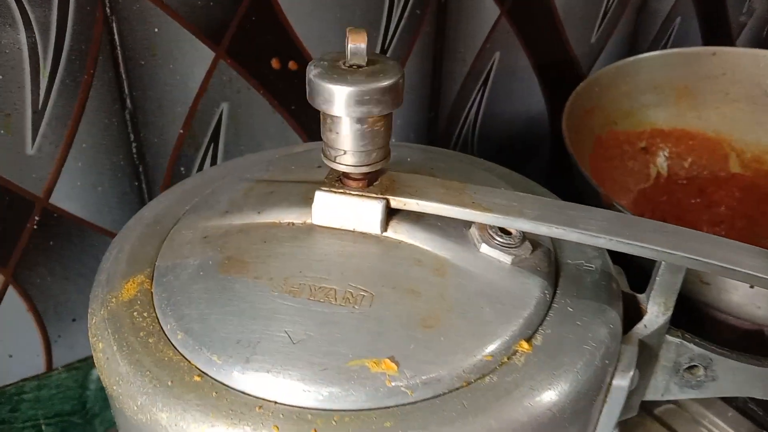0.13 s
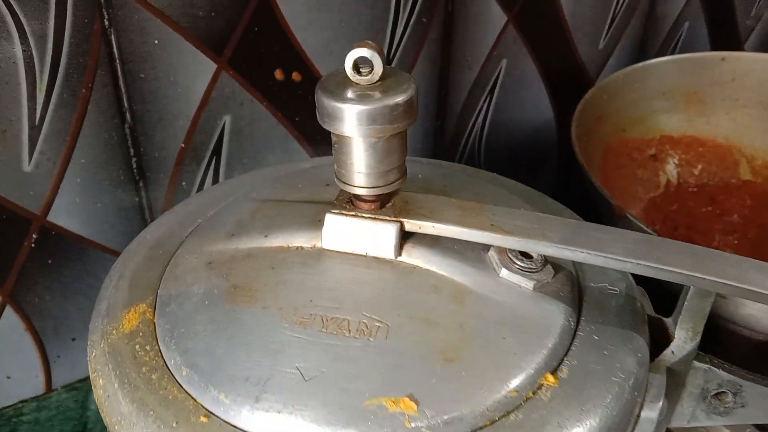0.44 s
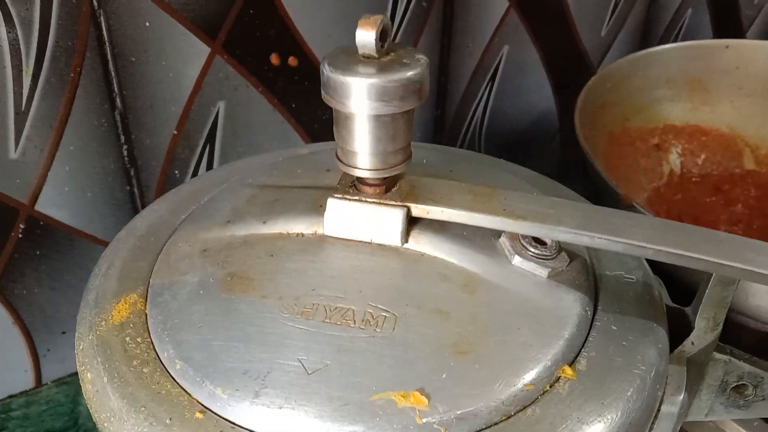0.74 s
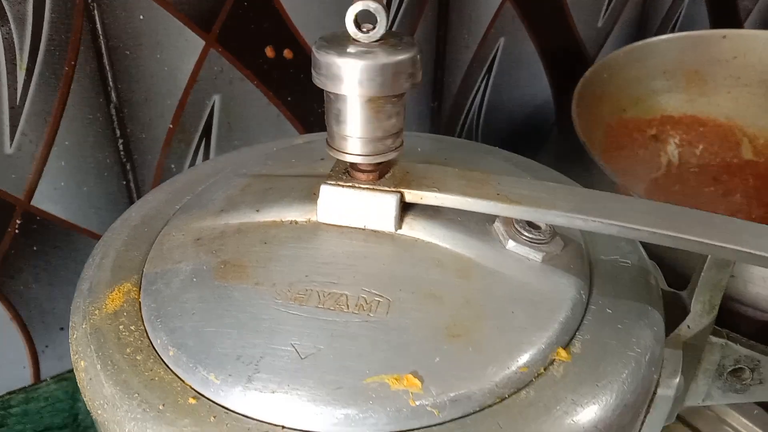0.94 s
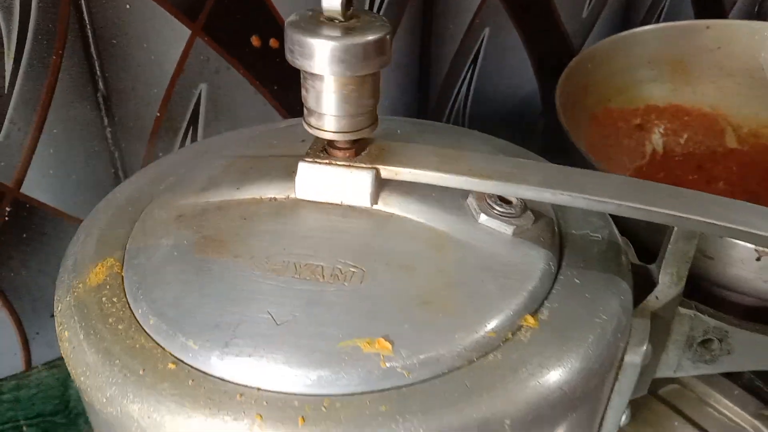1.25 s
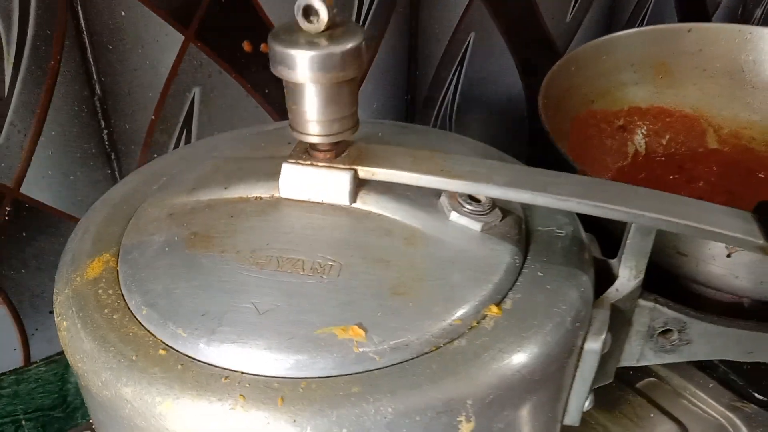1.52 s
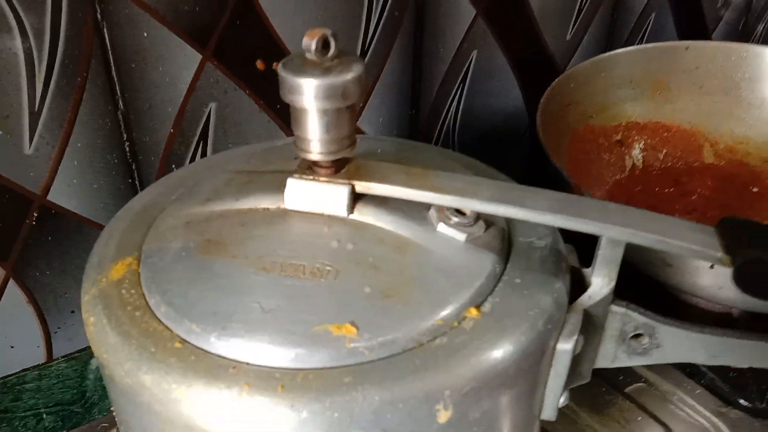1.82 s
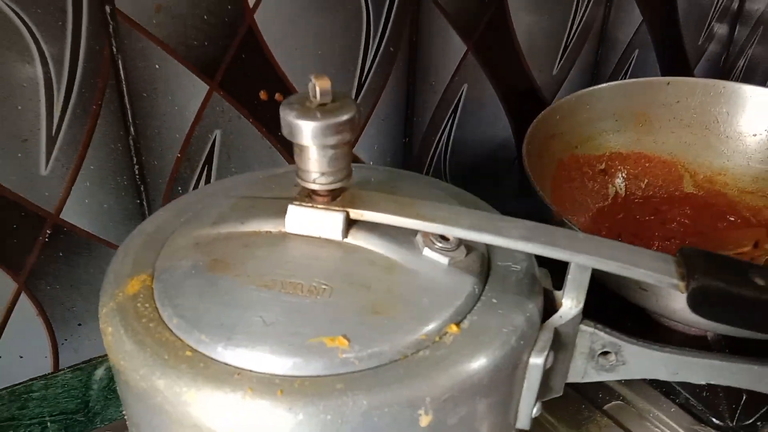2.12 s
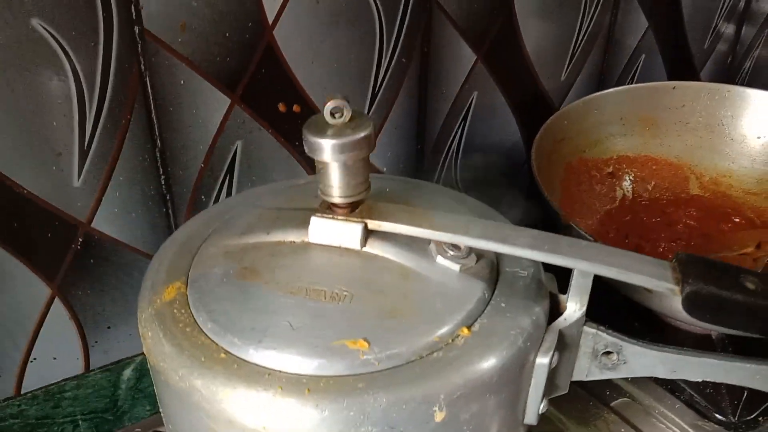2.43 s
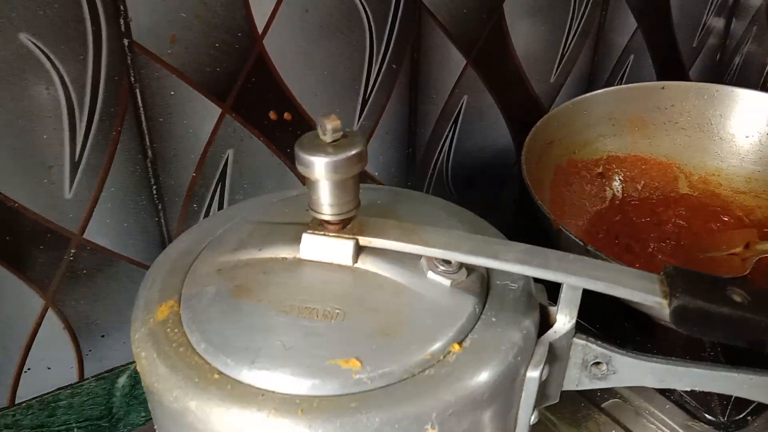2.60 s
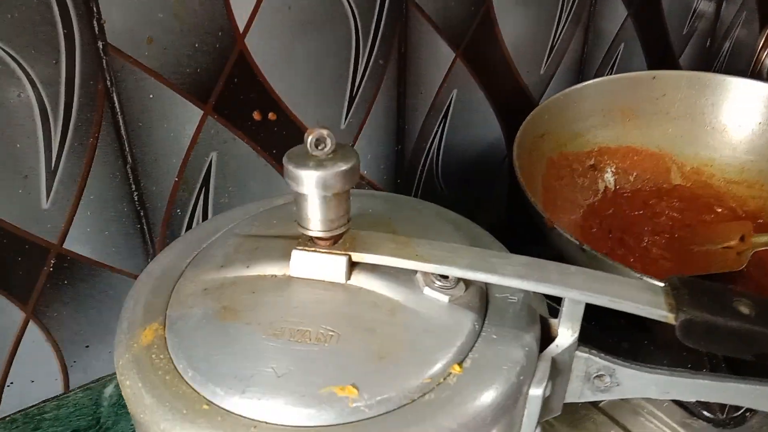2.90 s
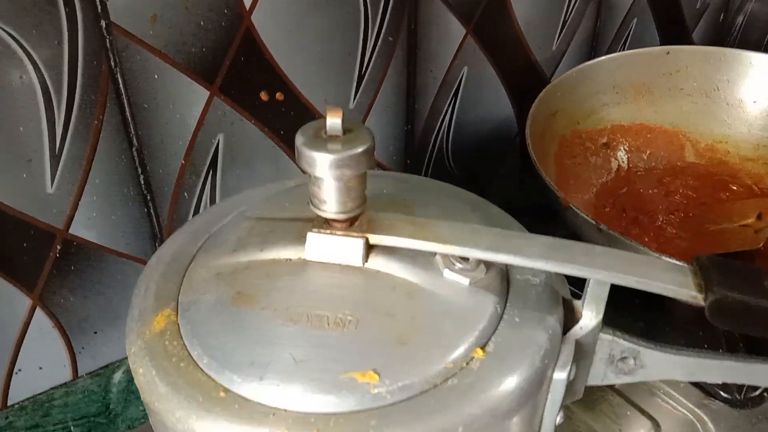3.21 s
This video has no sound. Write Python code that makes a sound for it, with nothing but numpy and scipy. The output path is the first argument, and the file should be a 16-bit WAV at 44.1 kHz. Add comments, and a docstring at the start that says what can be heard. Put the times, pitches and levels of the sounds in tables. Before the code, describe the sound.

Pressure cooker steam hisses continuously and loudly from the first instant, close to the microphone in a small, hard-tiled kitchen. Quick irregular swells, about seven per second, each add a hollow, breathy chuff under crisp sizzle and airy ringing. Swells weaken around 1.35-1.45 and 2.45 seconds, while the steady leak grows slightly later. A very faint low hum rises near 0.9 seconds; a light metallic pan knock comes around 3.3.

```python
"""Kitchen: a pressure cooker vents on the stove, close up, the same in both channels.
The valve weight turns and rocks, so a steady leak of steam swells about seven times a second.
Shaped noise makes the hiss and sizzle, droplets spit into it, and resonated noise rings the gaps of the weight;
each swell adds a hollow tone, a low rush and a breathy cavity. Lid, tiles and room reflect the steam.
A faint low hum comes and goes in the background, and at the end decaying sines knock a pan lightly."""
import sys
import numpy as np
from scipy import signal
from scipy.fft import rfft, irfft
from scipy.io import wavfile
from scipy.ndimage import uniform_filter1d, map_coordinates

SR = 44100
rng = np.random.default_rng(int(sys.argv[2]) if len(sys.argv) > 2 else 0)


def wav_out(sig):
    """Save sig, one row per channel (or a flat mono array), as 16-bit PCM at SR to the path in sys.argv[1]."""
    wavfile.write(sys.argv[1], SR, np.round(np.clip(np.atleast_2d(sig).T, -1, 1) * 32767).astype(np.int16))


N = 147735  # samples

# Kitchen background tone, relative: hz, level_db
KITCHEN_COLOUR = [(20, -16), (50, -16), (85, 4), (120, 4.5), (170, 11.5), (300, -1), (800, -17),
                  (3000, -35)]
KITCHEN_DB = -69
# Low hum resonances, before the hum fader: pitch_hz, width_hz of one filter pass, level_db
HUM_MODES = [(112, 28, -54), (155, 76, -59)]
# Hum fader: time_s, level_db
HUM_FADER = [(.55, -23), (.76, -6), (.87, 0), (1.02, -2), (1.08, -12.5), (1.75, -13), (2.0, -25)]

# Modes of lightly knocked cookware, relative: pitch_hz, level_db, t60_s
PAN_MODES = [(486, -11.5, .1), (800, -18, .06), (1250, -10, .1), (1950, 1.5, 0.057), (2400, -5.5, .08)]
KNOCK_S, KNOCK_DB, KNOCK_CONTACT_S = 3.329, -25, 0.00025  # start, level, softness of the attack

# Reflections from lid and tiles, against the direct steam: delay_s, level_db
NEAR_REFLECTIONS = [(.0031, -19.5), (.0053, -22.5), (.0084, -18.5), (0.0132, -22)]
SWAY_S, SWAYS_PER_S = .00005, 1  # rms delay change as the hand holding the microphone sways
ROOM_T60_S, ROOM_DB = 0.13, -9  # level against the direct steam
STEAM_DB = -0.81  # trim of the valve with its reflections and room

# Swells as the weight lifts, levels before the layer trims:
# centre_s (middle of the hiss swell), length_s (hiss, at half power), hiss_db, hollow_db, rush_db,
# lag_s (hollow tone, rush and cavity behind the hiss; negative leads)
WEIGHT_SWELLS = [(0.018, 0.088, -17, -31, -43.5, -0.0087), (0.191, 0.073, -16.5, -32.5, -45, -0.003),
                 (0.315, 0.071, -20.5, -40, -53, 0.007), (0.452, 0.076, -19, -32.5, -44, 0.025),
                 (0.546, 0.105, -21, -41, -55, 0.017), (0.646, 0.079, -19, -42.5, -51.5, 0.015),
                 (0.77, 0.1, -16.6, -36.5, -44.5, 0.0033), (0.906, 0.093, -16, -31, -42, -0.0018),
                 (1.072, 0.082, -18, -34.5, -48.5, -0.00063), (1.229, 0.08, -17.5, -34, -41, 0.012),
                 (1.347, 0.082, -27, -51, -54, 0.0044), (1.445, 0.083, -26.5, -35.5, -49, -0.0006),
                 (1.574, 0.089, -17.8, -33.5, -47.5, -0.0055), (1.75, 0.09, -17, -31, -43.5, 0.018),
                 (1.919, 0.1, -16.6, -31, -45.5, -0.0058), (2.058, 0.08, -22, -38, -50.5, -0.005),
                 (2.207, 0.081, -18.0, -33, -43.5, 0.0033), (2.444, 0.098, -27, -43, -56.5, 0.00074),
                 (2.59, 0.095, -22, -35, -57, 0.0062), (2.794, 0.1, -19.0, -37.5, -46, 0.013),
                 (2.948, 0.097, -17.5, -31.5, -42.5, 0.0077), (3.135, 0.1, -17.5, -32.5, -47, 0.027),
                 (3.331, 0.096, -21, -33.5, -49, 0.025)]
# Steady leak between swells, before the layer trims: time_s, level_db
STEADY_LEAK = [(0, -24.5), (.38, -25.5), (.52, -26), (1.3, -22.5), (1.65, -24.5), (2.3, -21.5),
               (3.35, -20.5)]

# Hollow tone under the weight, relative: hz, level_db
HOLLOW_COLOUR = [(100, -65), (700, -44), (1080, -6), (1270, -3.5), (1400, 1.5), (1600, 0.5), (1900, -4.5),
                 (2150, -4.5), (2550, -10), (3200, -15), (5000, -38)]
# Low rush, relative: hz, level_db
RUSH_COLOUR = [(30, -31), (100, -22), (170, -12.5), (280, -9), (420, -4.5), (500, 1.5), (720, 3.5),
               (870, 1.5), (1050, -2.5), (1500, -23), (3000, -47)]
HOLLOW_DB, RUSH_DB = -2, 0.5  # layer trims
HOLLOW_LEAK_DB, RUSH_LEAK_DB, CAVITY_LEAK_DB = -20.5, -36, -25  # against the steady leak
CAVITY_HZ, CAVITY_WIDTH_HZ = 1257, 114  # inside the weight; width of one filter pass
CAVITY_SWELL_DB = -7.5  # against the hollow tone of each swell, before its trim
# Swell shape: 2 is a bell, more is flatter; rush lengths are a share of the hiss lengths
HISS_SQUARENESS, RUSH_SQUARENESS, RUSH_LENGTH_SHARE = 3.06, 2.3, 0.84

# Jet hiss, relative: hz, level_db
HISS_COLOUR = [(100, -75), (1500, -30), (2700, -25), (3100, -14), (3300, -5.5), (3600, -4), (4700, -1.5),
               (5600, 1.5), (6350, -0.5), (7450, 2), (7950, -11.5), (8700, -5.5), (10000, -11),
               (15500, -37)]
# Finest sizzle at the lip of the valve, relative: hz, level_db
SIZZLE_COLOUR = [(500, -83), (6500, -26), (8000, -1.5), (8750, -7), (9250, 5.5), (9900, 1.5), (10350, 4),
                 (11000, -4), (11700, -4), (12450, -1.5), (13300, 0), (14000, -8), (14600, -5.5),
                 (15500, -4.5)]
# Ringing valve gaps, relative: pitch_hz, width_hz of one filter pass, level_db
VALVE_GAPS = [(5086, 170, -1.5), (5310, 140, -3.5), (5628, 250, -4.5), (5950, 110, -3), (6990, 360, -4.5),
              (7240, 91, -9.5)]
# Gap ringing against the usual flow: time_s, level_db
RING_FADER = [(0, -6.5), (.35, -8), (.65, -5), (1.05, -3), (1.35, -2), (1.6, -6.5), (1.9, -3.5),
              (2.35, -6.5), (2.75, -6.5), (3.35, -9)]
HISS_DB, SIZZLE_DB = -2, -6  # layer trims
USUAL_FLOW_DB = -20  # flow at which sizzle and ringing sit at their set balance
SIZZLE_FOLLOW, RING_FOLLOW = 1.21, 0.55  # dB of the layer per dB of flow
GAP_DRIFT, GAP_DRIFTS_PER_S = .008, 6  # rms share of pitch wander as the weight turns
SPITS_PER_S, SPIT_DB = 1300, -11  # droplet rate; level against the turbulence
SPIT_SPREAD_DB = 3.5  # mean of the random boost of a droplet, before its ceiling

TOP_HZ = 15550  # top of the recorder's band


def undb(db):
    """Decibels to gain."""
    return 10 ** (np.asarray(db) / 20)


def unit(x):
    """Scale to rms 1."""
    return x / np.sqrt(np.mean(x ** 2))


def curve(points):
    """Join (s, value) points by straight lines."""
    return np.interp(np.arange(N) / SR, *np.array(points).T)


def noise():
    """White noise as plain turbulence."""
    return rng.standard_normal(N)


def colour(x, points):
    """EQ by (Hz, dB) points joined over log frequency; rms 1."""
    hz, db = np.array(points).T
    f = np.maximum(np.arange(N // 2 + 1) * SR / N, 1)
    gain = undb(np.interp(np.log(f), np.log(hz), db))
    return unit(irfft(rfft(x) * gain, N))


def resonate(x, hz, width_hz):
    """One resonance, applied twice for steep skirts; rms 1."""
    b, a = signal.iirpeak(hz, hz / width_hz, fs=SR)
    once = signal.lfilter(b, a, x)
    return unit(signal.lfilter(b, a, once))


def wander(rate):
    """Smooth random motion of rms 1 that changes about rate times a second."""
    k = max(int(SR / rate), 2)
    smooth = uniform_filter1d(noise(), k, mode="wrap")
    return unit(uniform_filter1d(smooth, k, mode="wrap"))


def flutter(rate, depth_db):
    """A gain that wanders at random by depth_db rms."""
    return undb(depth_db * wander(rate))


def low_hum():
    """Rough hum: noise through low resonances, swelling briefly."""
    hum = sum(undb(db) * resonate(noise(), hz, width) for hz, width, db in HUM_MODES)
    return hum * undb(curve(HUM_FADER))


def kitchen():
    """Low background: noise coloured towards the bass."""
    return undb(KITCHEN_DB) * colour(noise(), KITCHEN_COLOUR)


def knock():
    """A light knock on a metal pan: decaying sine modes behind a short soft contact."""
    t = np.maximum(np.arange(N) / SR - KNOCK_S, 0)
    ring = np.zeros(N)
    for hz, db, t60 in PAN_MODES:
        decay = np.exp(-np.log(1000) * t / t60)
        ring += undb(db) * np.sin(2 * np.pi * hz * t) * decay
    contact = 1 - np.exp(-t / KNOCK_CONTACT_S)
    return undb(KNOCK_DB) * ring * contact


def room(x):
    """Dense reflections that die away: convolution with decaying noise of unit energy."""
    t = np.arange(SR // 2) / SR
    response = rng.standard_normal(len(t)) * np.exp(-np.log(1000) * t / ROOM_T60_S)
    return signal.fftconvolve(x, response / np.linalg.norm(response))[:N]


def tiles(x):
    """Near reflections comb the steam; their path lengths change slowly."""
    sample = np.arange(N)
    reflected = np.zeros(N)
    for delay, db in NEAR_REFLECTIONS:
        delay_s = delay + SWAY_S * wander(SWAYS_PER_S)
        reflected += undb(db) * map_coordinates(x, [sample - SR * delay_s], mode="mirror")
    return reflected


def bell(centre_s, length_s, squareness):
    """Power of a swell that rises and falls."""
    distance = np.abs((np.arange(N) / SR - centre_s) / (length_s / 2))
    return .5 ** (distance ** squareness)


def flow(centres, lengths, levels_db, leak_db, squareness):
    """Strength of the steam: the leak plus all swells, added in power."""
    power = undb(curve(STEADY_LEAK) + leak_db) ** 2
    for centre_s, length_s, db in zip(centres, lengths, levels_db):
        power += undb(db) ** 2 * bell(centre_s, length_s, squareness)
    return np.sqrt(power)


def rush():
    """Wet steam sputters under the lifted weight: a hollow tone, a low rush and the breathy cavity."""
    centres, lengths, _, hollow_db, rush_db, lags = np.array(WEIGHT_SWELLS).T
    centres, lengths = centres + lags, lengths * RUSH_LENGTH_SHARE

    hollow_flow = flow(centres, lengths, hollow_db, HOLLOW_LEAK_DB, RUSH_SQUARENESS)
    hollow = hollow_flow * colour(noise(), HOLLOW_COLOUR) * flutter(rate=49, depth_db=1.8)

    low_flow = flow(centres, lengths, rush_db, RUSH_LEAK_DB, RUSH_SQUARENESS)
    low = low_flow * colour(noise(), RUSH_COLOUR) * flutter(rate=28, depth_db=2.0)

    cavity_flow = flow(centres, lengths, hollow_db + CAVITY_SWELL_DB, CAVITY_LEAK_DB, RUSH_SQUARENESS)
    cavity = cavity_flow * resonate(noise(), CAVITY_HZ, CAVITY_WIDTH_HZ)

    layers = undb(HOLLOW_DB) * hollow + undb(RUSH_DB) * low + cavity
    return flutter(rate=44, depth_db=1.16) * layers


def follow(strength, slope):
    """A level that moves by slope dB for each dB of flow."""
    usual = undb(USUAL_FLOW_DB)
    return usual * (strength / usual) ** slope


def spray():
    """Turbulence with fine droplets spat into it as sparse clicks of either sign."""
    spat = rng.random(N) < SPITS_PER_S / SR
    sign = rng.choice([-1, 1], N)
    size = undb(SPIT_SPREAD_DB * np.minimum(rng.exponential(size=N), 3))
    return noise() + undb(SPIT_DB) * unit(spat * sign * size)


def drift(x):
    """Bend playback speed slightly so the pitch of a ringing wanders."""
    speed = 1 + GAP_DRIFT * wander(GAP_DRIFTS_PER_S)
    return map_coordinates(x, [np.cumsum(speed)], mode="mirror")


def valve_gaps():
    """Narrow resonances of the gaps, excited by noise, each wandering in pitch and level; rms 1."""
    ring = np.zeros(N)
    for hz, width, db in VALVE_GAPS:
        tone = drift(resonate(noise(), hz, width))
        ring += undb(db) * tone * flutter(rate=16, depth_db=1.5)
    return unit(ring)


def jet():
    """Steam escapes as bright hiss, a sizzle that swells more deeply, and ringing that swells less."""
    centres, lengths, hiss_db = np.array(WEIGHT_SWELLS).T[:3]
    strength = flow(centres, lengths, hiss_db, 0, HISS_SQUARENESS) * flutter(rate=51, depth_db=.5)
    hiss = undb(HISS_DB) * strength * colour(spray(), HISS_COLOUR)
    sizzle_level = undb(SIZZLE_DB) * follow(strength, SIZZLE_FOLLOW) * flutter(rate=220, depth_db=0.26)
    sizzle = sizzle_level * colour(spray(), SIZZLE_COLOUR)
    ring = undb(curve(RING_FADER)) * follow(strength, RING_FOLLOW) * valve_gaps()
    return hiss + sizzle + ring


def scene():
    """Mix the valve and its reflections with hum, kitchen and knock; the same in both channels."""
    steam = jet() + rush()
    valve = undb(STEAM_DB) * (steam + tiles(steam) + undb(ROOM_DB) * room(steam))
    background = low_hum() + kitchen()
    mono = valve + background + knock()
    return np.array([mono, mono])


def record(dry):
    """The recorder cuts the top with a steep elliptic low-pass."""
    low_pass = signal.ellip(12, .2, 80, TOP_HZ, fs=SR, output="sos")  # ripple and rejection in dB
    return signal.sosfilt(low_pass, dry)


dry = scene()
out = record(dry)
wav_out(out)
```